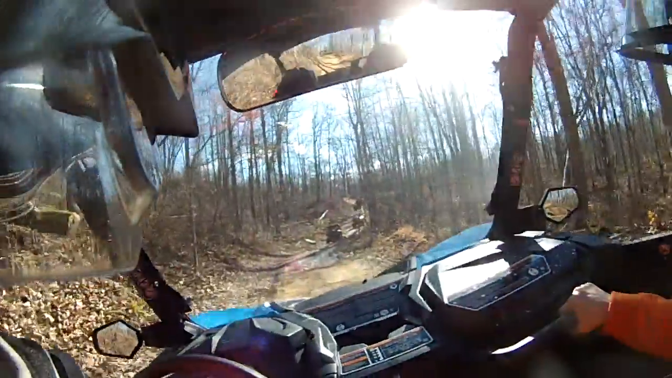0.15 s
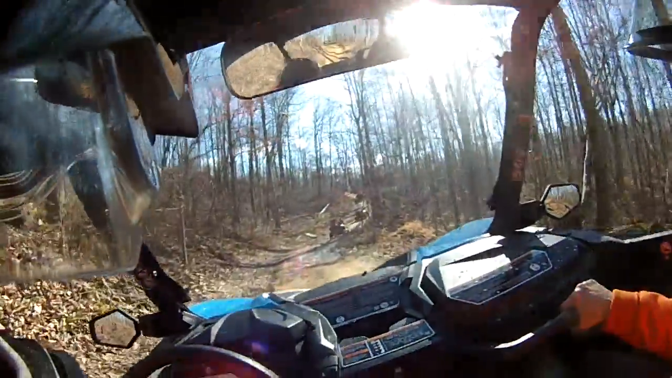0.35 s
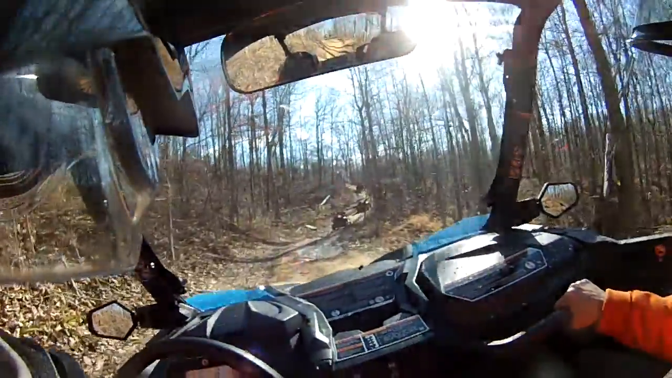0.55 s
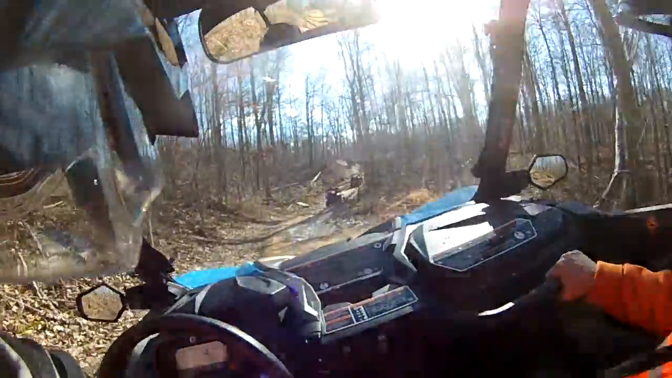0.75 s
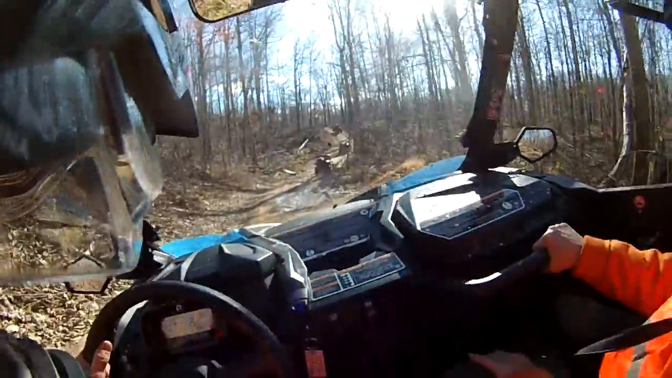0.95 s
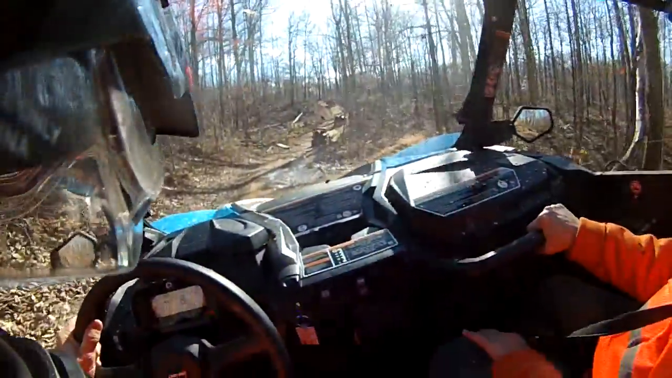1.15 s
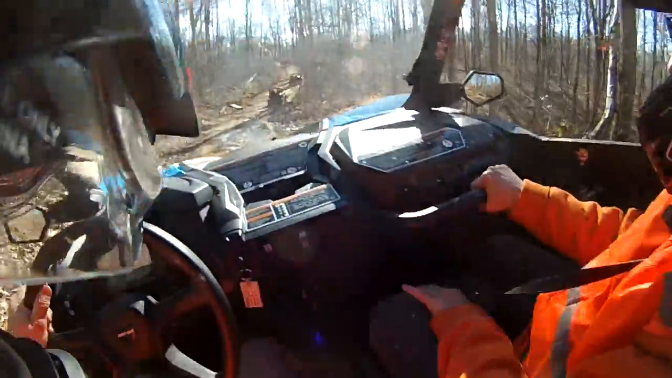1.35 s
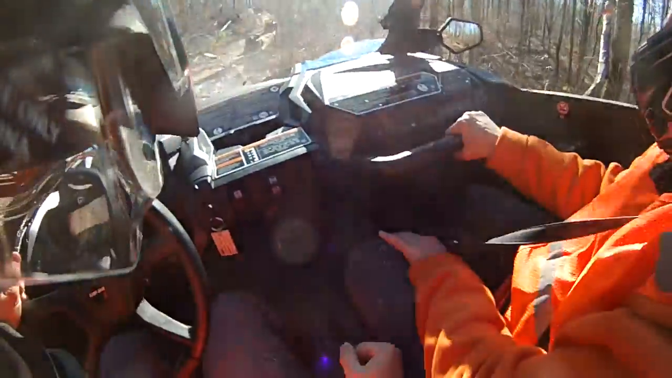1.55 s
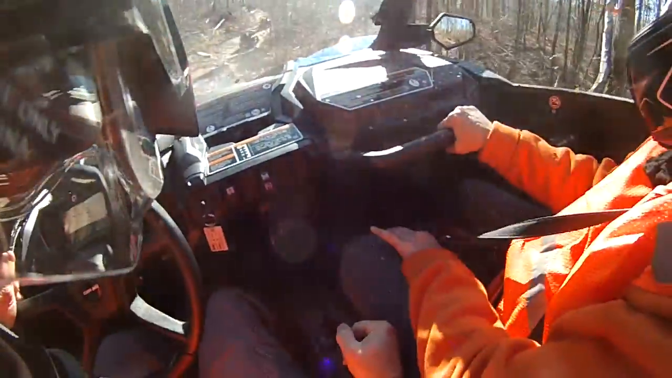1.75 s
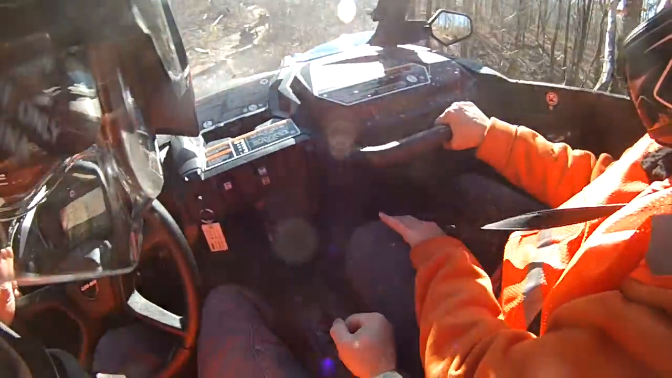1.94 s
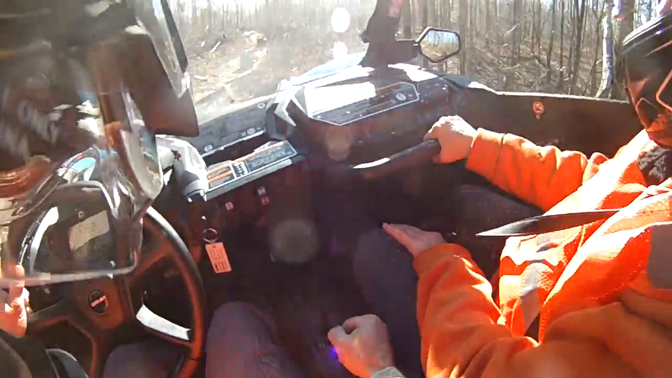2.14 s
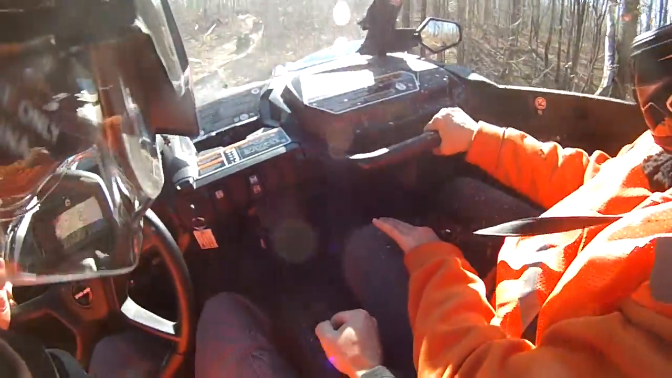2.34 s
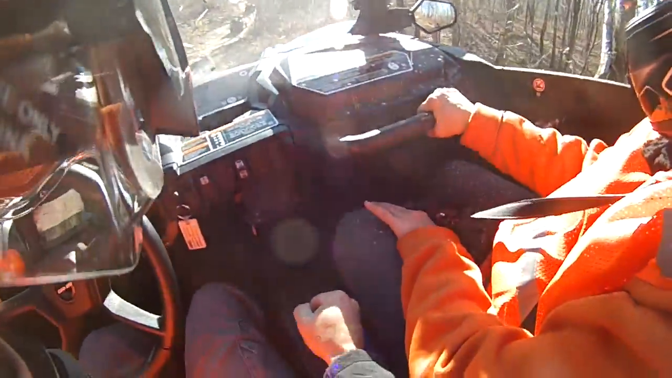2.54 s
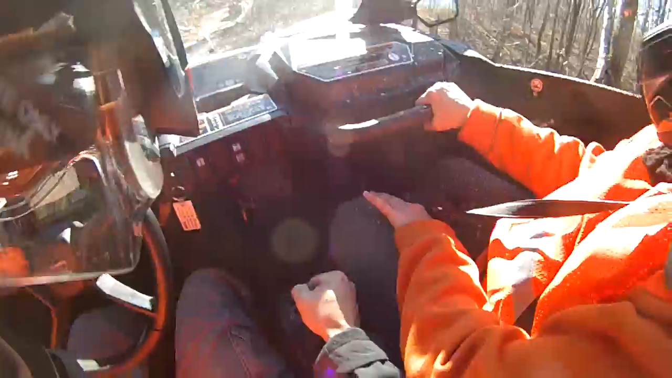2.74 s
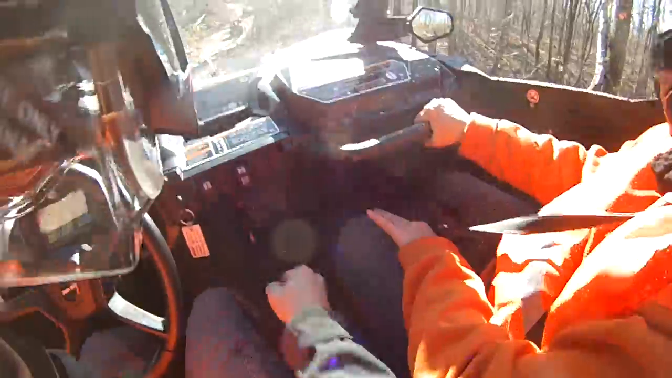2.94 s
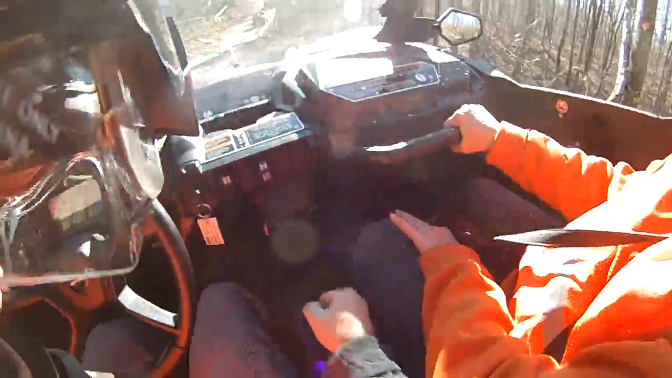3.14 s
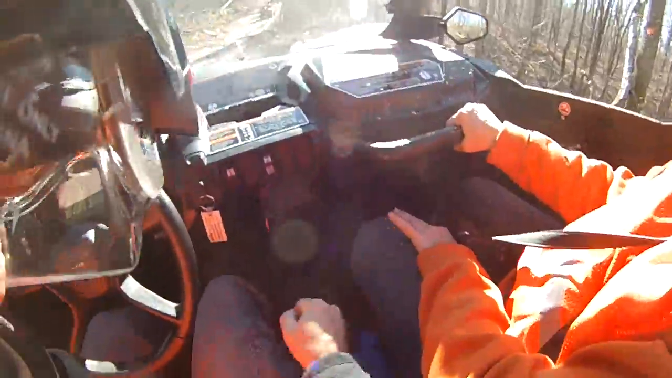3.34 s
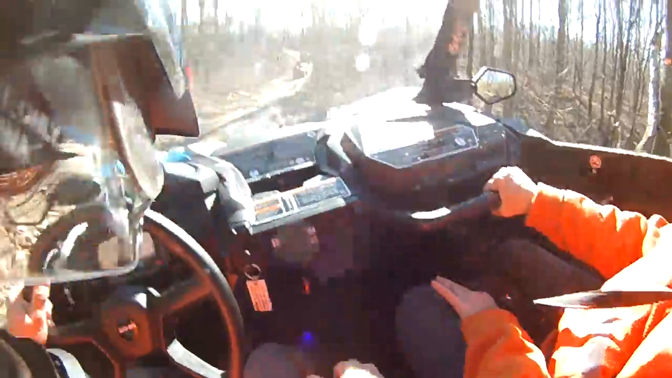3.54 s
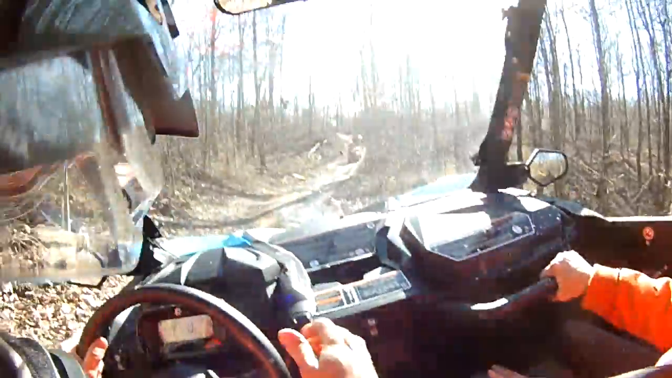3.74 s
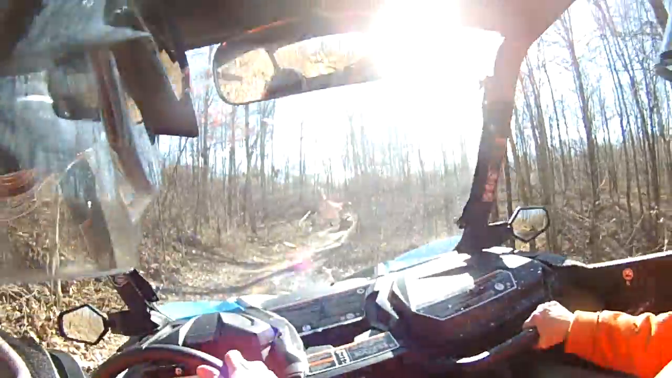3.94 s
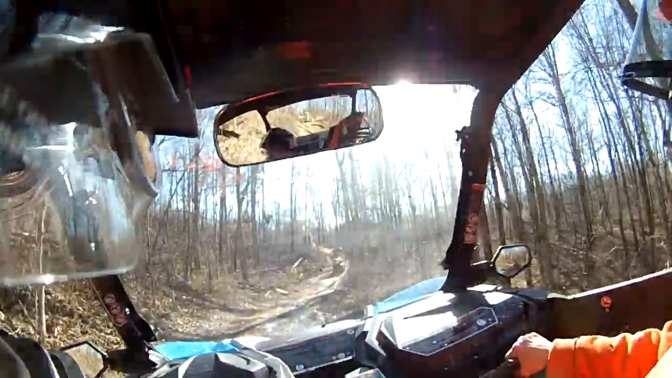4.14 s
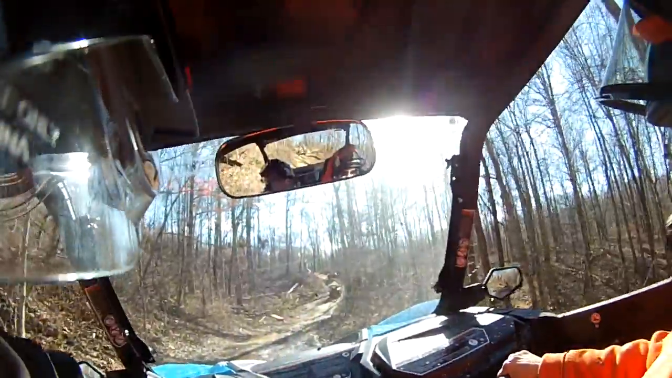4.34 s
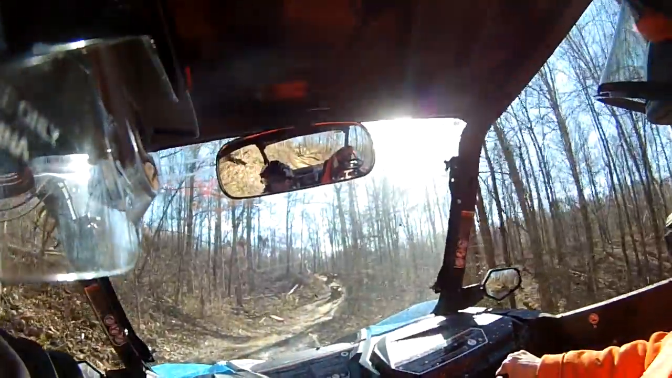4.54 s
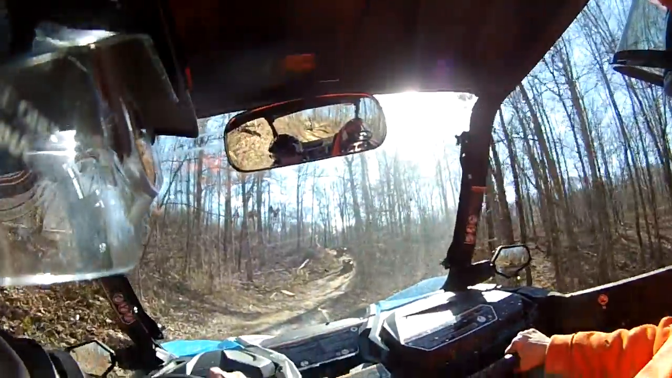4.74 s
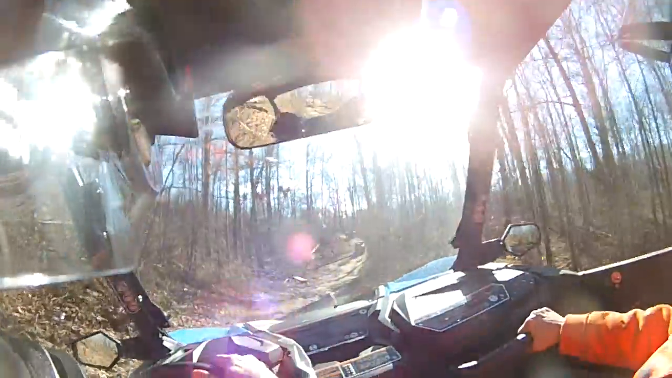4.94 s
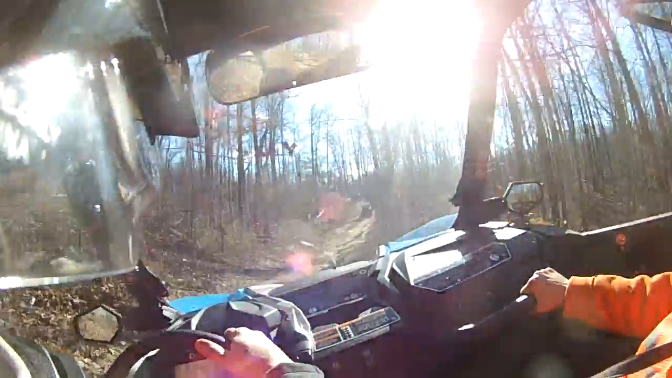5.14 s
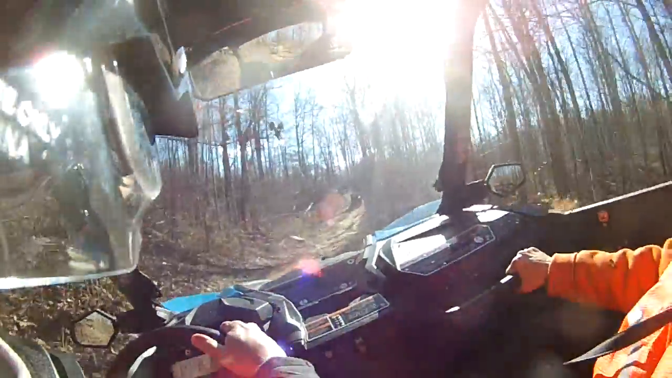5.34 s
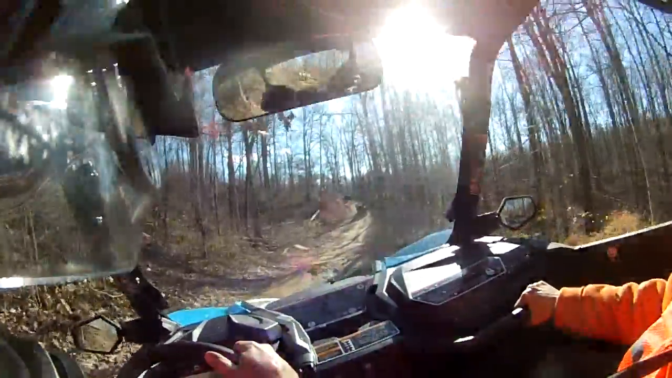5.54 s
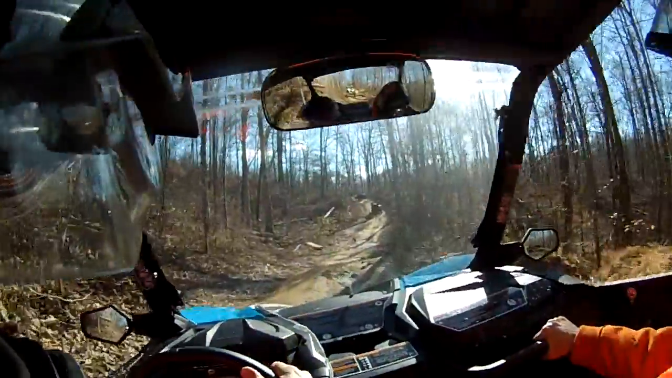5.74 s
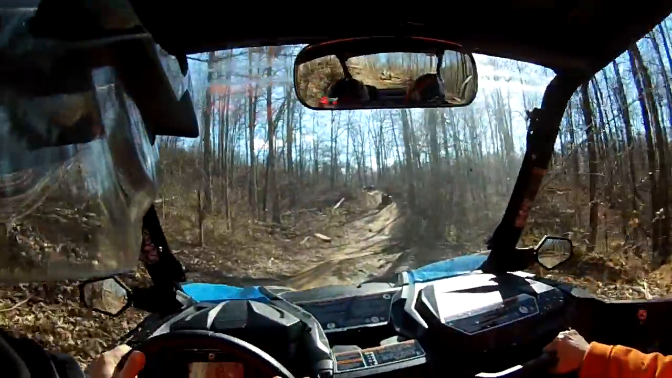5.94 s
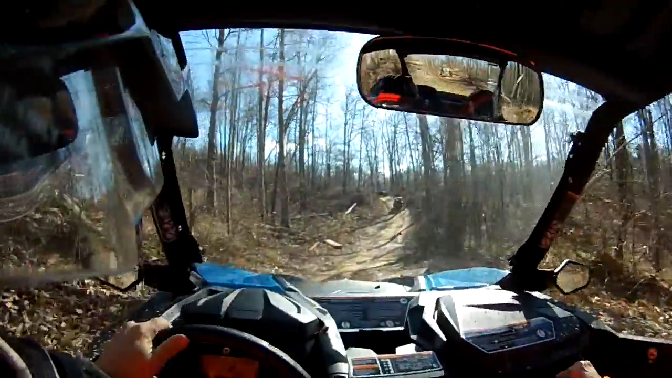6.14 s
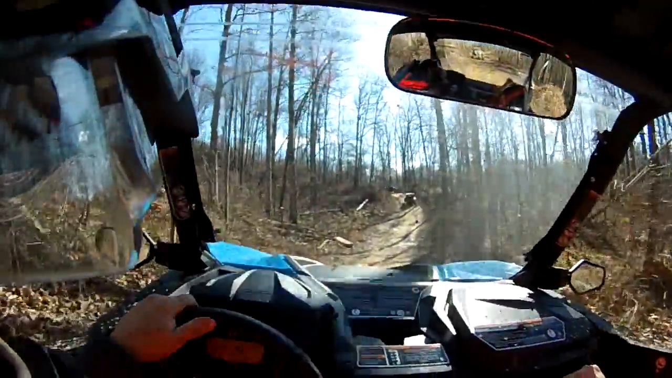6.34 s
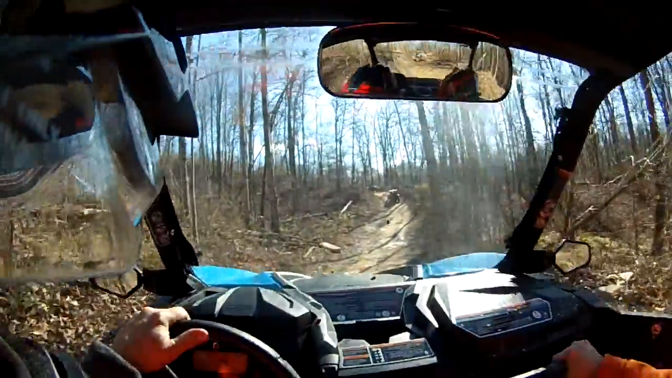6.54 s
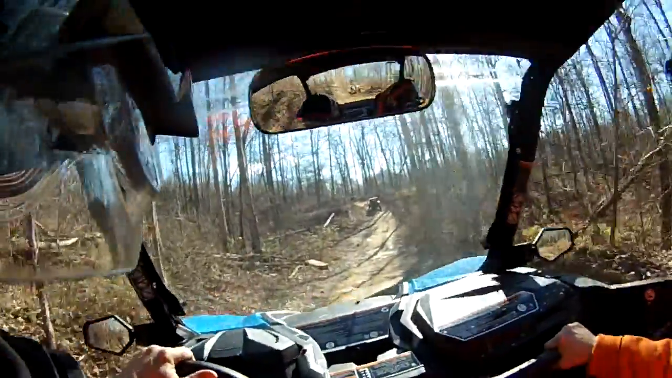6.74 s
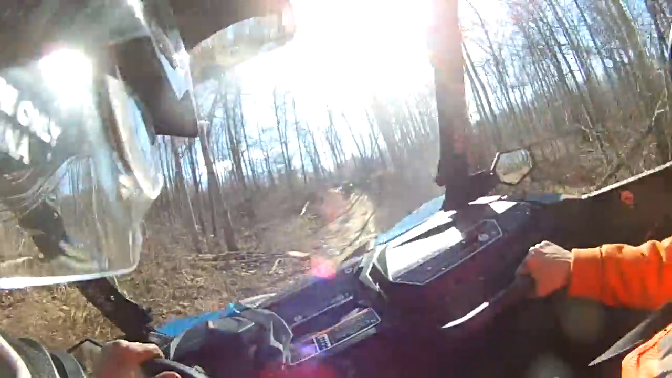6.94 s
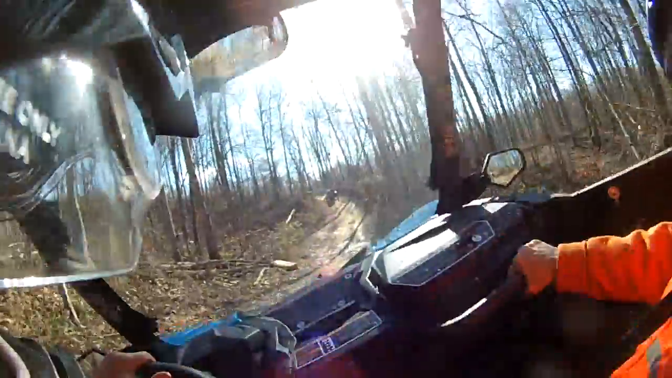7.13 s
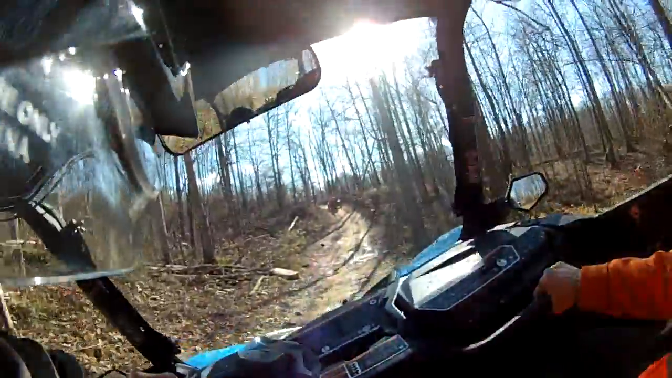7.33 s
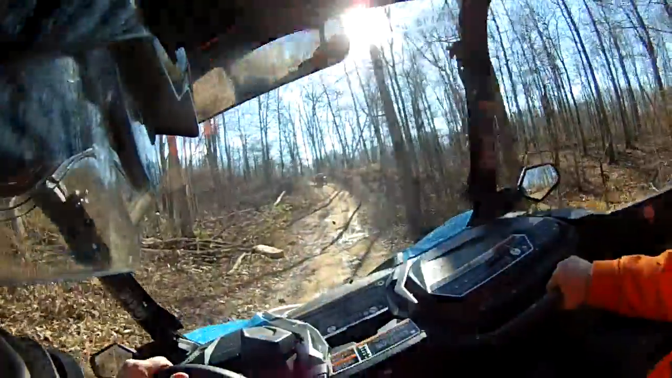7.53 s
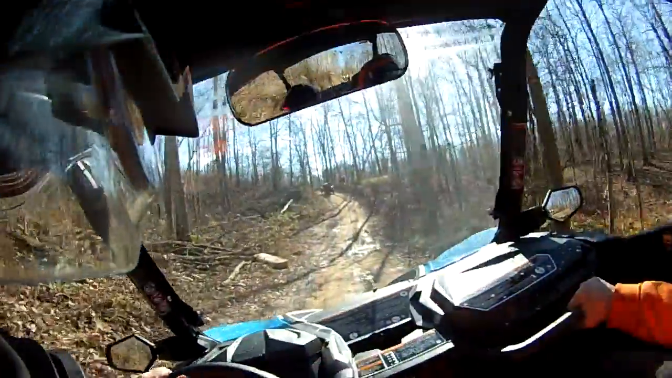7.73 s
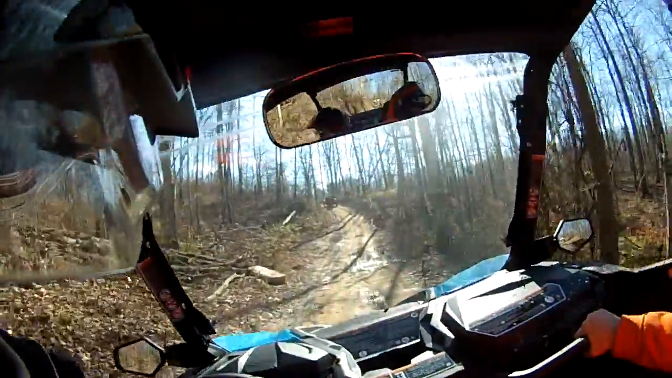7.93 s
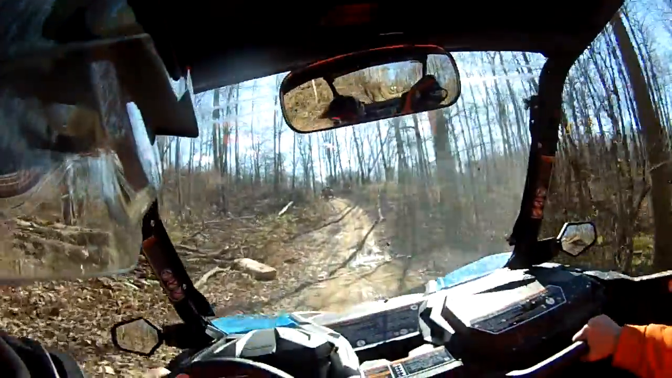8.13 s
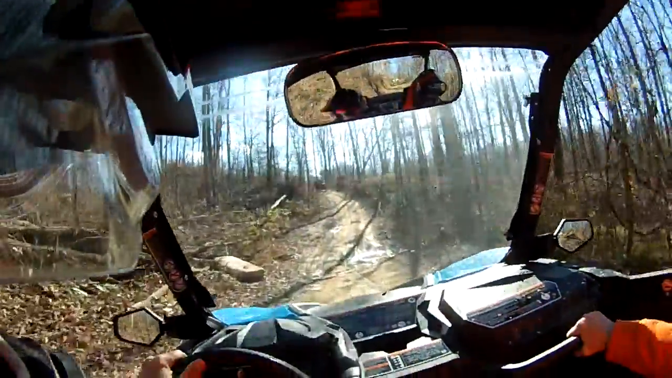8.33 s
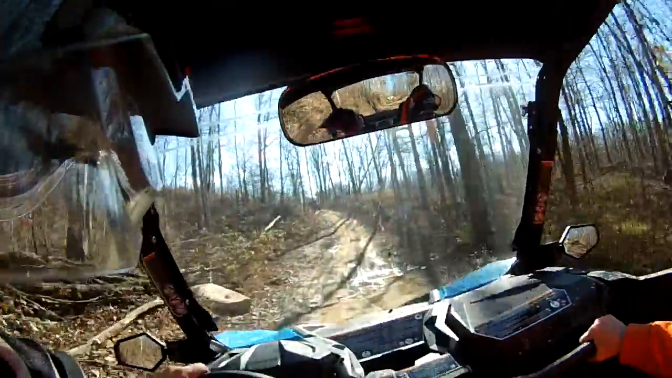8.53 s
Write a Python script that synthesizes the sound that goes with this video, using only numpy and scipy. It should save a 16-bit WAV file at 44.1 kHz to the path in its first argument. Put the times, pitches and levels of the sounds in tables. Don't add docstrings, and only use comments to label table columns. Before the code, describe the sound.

A close, bass-heavy microphone in a small trail vehicle catches a chugging engine easing off, with faint high brake squeaks. In the lumpy idle, loose panels rattle and two sharp groups of plastic lever clicks stand out. Throttle returns, and the engine climbs to a coarse, clattering growl that wavers in pitch, with low frame rumble, airy hiss and another vehicle's engine droning behind.

```python
import sys
import numpy as np
from scipy import signal
from scipy.fft import rfft, irfft, next_fast_len
from scipy.io import wavfile
from scipy.ndimage import uniform_filter1d, map_coordinates

SR = 44100
rng = np.random.default_rng(int(sys.argv[2]) if len(sys.argv) > 2 else 0)


def waveform_to_disk(signal):
    frames = np.transpose(np.atleast_2d(signal))
    scaled = np.clip(frames, -1, 1) * 32767
    samples = np.round(scaled).astype(np.int16)
    wavfile.write(sys.argv[1], SR, samples)


def undo_db(level):
    steps = np.asarray(level, float) / 20
    return 10 ** steps


N = 382788

# f/Hz, density level/dB
FLOOR_SPECTRUM = [(260, -26), (450, 6.5), (605, -8.5), (671, -3.5), (1020, -9.5), (1090, -13), (1330, -14),
                  (1840, -20), (1950, -12), (2400, -13), (3370, -26.5), (10200, -37), (11700, -36),
                  (14000, -33), (15500, -33)]
# f/Hz, level/dB
RUMBLE_SPECTRUM = [(15, -43), (30, 1.5), (70, -5), (150, 17), (210, 4.5), (300, -17), (420, -9),
                   (600, -47.5), (900, -71)]
# f/Hz, density level/dB
HISS_SPECTRUM = [(2470, -33), (4200, -7.5), (5280, -8), (6610, -5.5), (9220, 3), (11000, -4), (12500, -6),
                 (14000, 0), (14700, -8), (15500, -6.5)]
# f/Hz, density level/dB
CLATTER_SPECTRUM = [(210, -33), (350, 1), (378, -7.5), (447, -4.5), (541, -5.5), (755, -11), (848, -8),
                    (1150, -12), (1670, -10), (1850, -13.5), (2310, -14.5), (3180, -24.5), (4270, -39),
                    (5170, -43), (7500, -31.5), (9750, -88), (16500, -120)]
# t/s, clatter level/dB
LOAD = [(0, -41.5), (.29, -42.5), (.94, -47.5), (1.45, -53), (1.67, -59.5), (2.17, -56), (2.42, -59.5),
        (3.72, -61.5), (3.92, -50), (4.25, -44), (4.78, -40.5), (5.27, -38.5), (6.21, -39.5), (6.55, -42),
        (7.4, -43.5), (8.24, -39.5), (8.68, -40)]
# engine order, level re clatter/dB
WHINES = [(16, -17), (22, -18), (24, -22), (34, -15), (35, -17), (40, -14), (44, -11)]
# t/s, length/s, f/Hz, level re clatter/dB
CASING_RINGS = [(0, 0.67, 1713, -14), (4.1, 0.6, 840, -16), (4.2, 0.55, 1520, -10), (5.2, .7, 1304, -20),
                (5.2, 1.4, 814, -24), (5.4, 0.59, 1652, -15), (5.9, 1.05, 1465, -11.5), (6.7, .5, 406, 1),
                (7, 1.2, 835, -12), (7.45, 0.38, 398, -0.5), (7.4, 0.45, 1555, -18), (7.9, 0.87, 1700, -12)]
# f/Hz, width/Hz, level/dB
PANELS = [
    (290.7, 13, -55),
    (374, 19, -55.5),
    (632, 13.5, -68),
    (1506, 115, -70.5),
]
# t/s, peak level/dB, t60/s, top level/dB, thump level/dB
CLICKS = [(1.358, -46, .006, 20, 0), (2.676, -43, .03, -2, -12), (2.925, -33, 0.05, 4, -5),
          (2.928, -34, 0.055, 7, 0), (2.938, -33, 0.12, 5, 0), (2.965, -37.5, 0.12, -2, -5),
          (2.979, -50, .06, -4, 0), (3.3215, -28.5, 0.029, -1, -12), (3.325, -35, 0.054, 0, -3),
          (3.3324, -37, 0.034, 4, -6), (3.344, -37.5, 0.06, -8, 1), (3.874, -38, .2, -8, -3),
          (7.084, -35, 0.09, -2, -11)]
# f/Hz, width/Hz, level/dB
HOUSING_MODES = [(284, 21, 13), (442, 52, 12.5), (930, 150, 3), (1310, 57, 0.5), (1388, 44, 1.5),
                 (1796, 160, 5.5), (2025, 120, -1), (2320, 130, -18), (3180, 210, -15.5), (6800, 2400, -15),
                 (9500, 3000, -20), (13500, 3000, -27)]
# t/s, length/s, f/Hz, glide/Hz, level/dB
SQUEAKS = [(.73, .03, 9550, -4, -62), (0.878, .04, 9550, -3, -68), (0.932, .065, 7500, 0, -57),
           (0.998, .05, 7520, 0, -64), (1.15, .04, 14000, -4, -69), (1.177, 0.037, 7450, 0, -63),
           (1.325, .075, 7570, 0, -69), (1.496, .055, 14050, 37, -57), (1.72, .04, 7450, 0, -80),
           (1.769, 0.12, 9640, 150, -60.5), (1.894, 0.1, 7530, -50, -62.5), (1.99, 0.11, 7520, -30, -57),
           (2.03, .055, 10800, 0, -79), (2.095, 0.116, 7500, 30, -60)]

# t/s, cycle f/Hz
OTHER_SPEED = [(0.0, 39.4), (0.56, 37.7), (1.33, 38.2), (2.39, 38.6), (2.5, 34.9), (2.79, 37.6),
               (3.44, 38.2), (3.72, 32.9), (3.97, 30.9), (4.25, 31.4), (4.99, 28.1), (5.64, 25.6),
               (6.17, 26.9), (6.73, 31.8), (7.16, 30.2), (7.66, 32.2), (8.68, 31.4)]
# t/s, level/dB, brightness/dB per octave
OTHER_DRIVE = [(0, -25, 4), (.6, -7, -1.5), (1.3, -3.5, -1), (1.7, -2.5, -3), (2.1, -9, 4.5), (2.6, 0.5, 3),
               (3.1, -2.2, -3), (3.7, -3.2, 0), (4.3, 12, 5), (5, 6.5, -6), (5.45, 8, -2), (5.65, 0.5, 6.5),
               (6.4, 8.5, -3), (7.2, 6.9, -2), (8, 5.5, 4), (8.68, 2, 0)]
OTHER_MAIN = {2: -39.5, 3: -45, 4: -41, 5: -34}
# f/Hz, level/dB
OTHER_PIPE = [(12, -62), (35, -51.5), (230, -56.5), (400, -70), (900, -80)]
# f/Hz, level/dB
WAY_IN = [(50, -9.5), (62, 0.5), (75, 10), (90, -0.5), (115, -11), (150, -0.5), (195, -8)]

# t/s, cycle f/Hz
OWN_SPEED = [(0.0, 34.0), (0.46, 31.5), (0.93, 26.7), (1.79, 14.9), (2.24, 15.5), (2.73, 13.4),
             (3.54, 13.5), (4.15, 25.1), (4.55, 30.0), (4.9, 30.7), (5.32, 38.2), (6.22, 37.3),
             (6.75, 31.8), (7.16, 34.9), (7.26, 30.5), (7.6, 33.6), (8.32, 38.1), (8.68, 35.8)]
# t/s, exhaust effort level/dB, brightness/dB per octave, intake boom level/dB
OWN_DRIVE = [(0, 0.5, -5.5, 9), (.5, -1.3, -8.5, 1.2), (.93, -6.4, -9.5, 7.5), (1.5, -18, -10, -3.3),
             (2.1, -11.5, -1.5, -14), (2.6, -11, -2.5, -19), (3.2, 4, 9.5, -14), (3.65, -10.5, 1.5, 10),
             (4.25, -1, 6.8, 2.8), (4.7, .6, 0.7, 2.7), (5.5, -2.5, 6, 13.5), (6.15, -4.5, 6.5, 3.2),
             (6.5, -4.7, 9.7, 5), (6.9, -8.7, 4, 6), (7.15, -4, 4.5, 6.5), (7.4, -7, 0, 1.8),
             (8, -1.5, 5, 10.5), (8.68, -3, 2, 2)]
OWN_MAIN = {2: -34.5, 3: -31.5, 4: -30, 5: -33, 6: -37.5, 8: -46.5}
# f/Hz, level/dB
OWN_PIPE = [(12, -60), (35, -39.5), (100, -28), (150, -35), (200, -61.5), (250, -55), (285, -53.5),
            (330, -62), (390, -55), (450, -67), (600, -68.5), (900, -91)]
# f/Hz, level/dB
CAB = [(25, 7), (50, -4), (68, 6), (85, 5.5), (110, 1.6), (150, 2.5), (200, -0.7), (300, -2.7)]
# t/s, phase/turns
PULSE_LEAN = [
    (0, .25),
    (3.6, .25),
    (4.1, -.15),
    (8.68, -.15),
]

IDLE_HZ, IDLE_LUMPS = 22, 0.7


def evened(x):
    return x / np.sqrt(np.mean(x ** 2) + 1e-20)


def read(points, hz):
    f, value = np.transpose(points)
    return np.interp(np.log(hz + 1), np.log(f + 1), value)


def curves(rows):
    s, *columns = np.transpose(rows)
    return [np.interp(np.arange(N) / SR, s, c) for c in columns]


def drift(per_s):
    knots = rng.standard_normal(600)
    return map_coordinates(knots, [np.arange(N) / SR * np.clip(per_s, .1, 60)], order=2)


def add(mix, s, sound):
    part = mix[round(s * SR):][:len(sound)]
    part += sound[:len(part)]


def resonate(x, hz, width):
    turn = np.exp(2j * np.pi * np.cumsum(hz * np.ones(len(x))) / SR)
    r = np.exp(-np.pi * width / SR)
    return 2 * (turn * signal.lfilter([1 - r], [1, -r], x / turn)).real


def noise(shape, patchy_db, size=1024):
    hz = np.fft.rfftfreq(size, 1 / SR)
    a, b, patches = rng.standard_normal((N * 4 // size + 5, len(hz), 3)).T
    patches = uniform_filter1d(patches, size=8, axis=0)
    patches = evened(uniform_filter1d(patches, size=14, axis=1))
    z = (a + 1j * b) * undo_db(read(shape, hz)[:, None] + patchy_db * patches)
    return evened(signal.istft(z, nperseg=size, noverlap=size * 3 // 4)[1][:N])


def rustle():
    puffs = undo_db(4 * np.clip(drift(40), 0, 2))
    floor = undo_db(-56.5) * noise(FLOOR_SPECTRUM, patchy_db=2.2)
    return floor + undo_db(-76) * puffs * noise(HISS_SPECTRUM, patchy_db=1, size=256)


def road_rumble(clatter_db):
    rumble_db = -40.5 + .25 * (clatter_db + 50)
    return undo_db(rumble_db) * noise(RUMBLE_SPECTRUM, patchy_db=1.5, size=4096)


def intake_hiss(clatter_db, firing):
    over_knee_db = clatter_db + 43
    hiss_db = -66.5 + np.minimum(0.86 * over_knee_db, 0.45 * over_knee_db)
    hiss = noise(HISS_SPECTRUM, patchy_db=2) * evened(1 + 0.25 * firing)
    return undo_db(hiss_db + 7) * hiss


def valve_train(turns, speed_hz):
    cycles = rng.standard_normal((30, 512))
    place = [np.arange(N) / SR * 3.2, turns % 1 * 512]
    knocks = map_coordinates(cycles, place, mode="grid-wrap")
    size = next_fast_len(N)
    hz = np.fft.rfftfreq(size, 1 / SR)
    spectrum = rfft(knocks * np.sqrt(speed_hz), size) * undo_db(read(CLATTER_SPECTRUM, hz))
    return evened(irfft(spectrum)[:N])


def clatter(turns, speed_hz, firing):
    repeat = .45
    loose = noise(CLATTER_SPECTRUM, patchy_db=1.6) * evened(1 + 0.23 * firing)
    return np.sqrt(repeat) * valve_train(turns, speed_hz) + np.sqrt(1 - repeat) * loose


def whines(turns, speed_hz):
    out, loaded_db = np.zeros(N), 2.5 * (speed_hz - 38)
    for k, db in WHINES:
        out += undo_db(db + loaded_db + 2.5 * drift(3)) * np.cos(2 * np.pi * k * turns)
    return out


def thumps(turns):
    return evened(np.diff(np.floor(turns), prepend=0) * undo_db(1.5 * rng.standard_normal(N)))


def casing(turns):
    out, shake = np.zeros(N), thumps(turns) + .45 * rng.standard_normal(N)
    for s, length, hz, db in CASING_RINGS:
        part = shake[round(s * SR):][:round(length * SR)]
        rung = resonate(resonate(part, hz, 40), hz, 40)
        add(out, s, undo_db(db) * evened(rung) * signal.windows.tukey(len(part), .6))
    return out


def machinery(turns, speed_hz):
    clatter_db = curves(LOAD)[0]
    firing = np.exp(-(2 * turns % 1) / 0.38) * undo_db(1.9 * drift(45))
    metal = clatter(turns, speed_hz, firing) + whines(turns, speed_hz) + casing(turns)
    return undo_db(clatter_db) * metal + intake_hiss(clatter_db, firing) + road_rumble(clatter_db)


def panels(turns):
    cycle_hz = np.gradient(turns) * SR
    rattle = (.12 + np.exp(-(turns % 1) / .3)) * rng.standard_normal(N)
    shake = thumps(turns) * IDLE_HZ / cycle_hz + .9 * rattle
    out = np.zeros(N)
    for hz, w, db in PANELS:
        out += undo_db(db) * evened(resonate(resonate(shake, hz, 3 * w), hz, 1.45 * w))
    return out


def lever():
    out, t = np.zeros(N), np.arange(6000) / SR
    bursts = rng.standard_normal((len(CLICKS), len(t)))
    for (s, db, t60, top_db, thump_db), burst in zip(CLICKS, bursts):
        hit = burst * undo_db(-60 * t / t60) + 4 * (t == 0)
        rung = np.zeros(len(t))
        for hz, w, mode_db in HOUSING_MODES:
            mode_db = mode_db + top_db * (hz > 3000) + thump_db * (hz < 1000)
            rung += undo_db(mode_db) * evened(resonate(resonate(hit, hz, 5 * w), hz, w))
        add(out, s, undo_db(db) * rung / abs(rung).max())
    return out


def brakes():
    out, wobble = np.zeros(N), drift(58)
    for s, length, hz, glide, db in SQUEAKS:
        u = np.linspace(0, 1, round(length * SR))
        shaky_hz = hz * (1 + 0.0046 * wobble[round(s * SR):][:len(u)]) + glide * (u - .5)
        tone = np.sin(2 * np.pi * np.cumsum(shaky_hz) / SR)
        add(out, s, np.sqrt(2) * undo_db(db) * tone * signal.windows.tukey(len(u), .6))
    return out * undo_db(3 * np.clip(drift(57), -3, 1))


def engine(speed, main, colour, drive, pipe, load_db, lean, count, uneven_db, slip):
    inertia_s, pivot_hz, boom_order = .14, 120, 4
    speed_hz = uniform_filter1d(curves(speed)[0], round(inertia_s * SR), mode="nearest")
    effort_db, bright, boom_db = drive
    lumps = 1 + IDLE_LUMPS * np.clip(2 - 2 * speed_hz / IDLE_HZ, 0, 1)
    turns = .38 + np.cumsum(speed_hz) / SR + slip * drift(12)
    out = np.zeros(N)
    for k in range(1, count):
        waver_db, hz = uneven_db * lumps * drift(5), k * speed_hz
        if k in main:
            db = main[k] + effort_db + read(colour, hz) + bright * np.log2(hz / pivot_hz)
            db = db + boom_db * (k == boom_order) + waver_db
        else:
            db = load_db + read(pipe, hz) + 1.5 * (-1) ** k + min(k, 2.6) * waver_db
        scatter = np.clip((k - 4) / 9, .04, 1) * (rng.random() - .5) + .035 * drift(1.5)
        out += np.sqrt(2) * undo_db(db) * np.cos(2 * np.pi * (k * turns + lean + scatter))
    return out, turns, speed_hz


def other_vehicle():
    drive = (*curves(OTHER_DRIVE), 0)
    return engine(OTHER_SPEED, OTHER_MAIN, WAY_IN, drive, OTHER_PIPE, load_db=0, lean=0,
                  count=10, uneven_db=1.5, slip=.005)[0]


def own_engine():
    drive = curves(OWN_DRIVE)
    load_db = 0.72 * (curves(LOAD)[0] + 49) - 1.95 + 0.5 * drive[1]
    return engine(OWN_SPEED, OWN_MAIN, CAB, drive, OWN_PIPE, load_db, lean=curves(PULSE_LEAN)[0],
                  count=20, uneven_db=1.1, slip=.001)


def scene():
    own, turns, speed_hz = own_engine()
    background = rustle() + other_vehicle()
    cab = machinery(turns, speed_hz) + panels(turns) + lever() + brakes()
    return (background + cab + own)[None]


def band_limit(x):
    return signal.sosfilt(signal.butter(12, 15800, fs=SR, output="sos"), x)


def record(dry):
    low_cut = signal.butter(2, 20, "high", fs=SR, output="sos")
    band = signal.firwin(255, 15350, window=("kaiser", 5), fs=SR)
    heard = signal.oaconvolve(signal.sosfilt(low_cut, dry), band[None], "same")
    return band_limit(heard)


dry = scene()
out = record(dry)
waveform_to_disk(out)
```